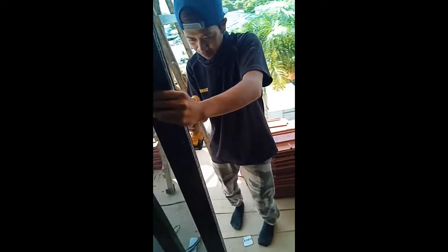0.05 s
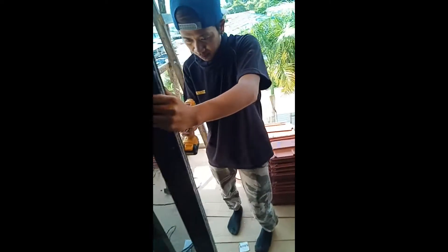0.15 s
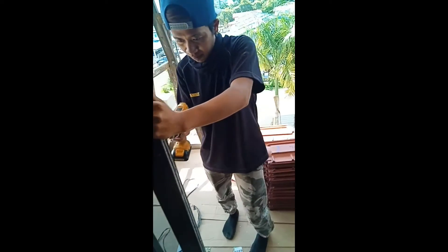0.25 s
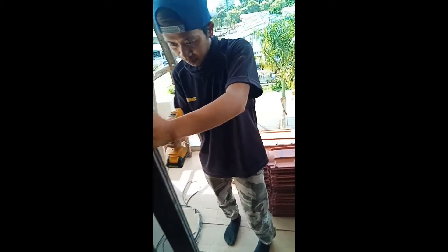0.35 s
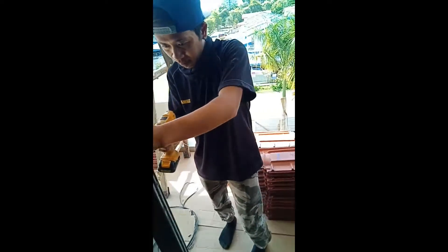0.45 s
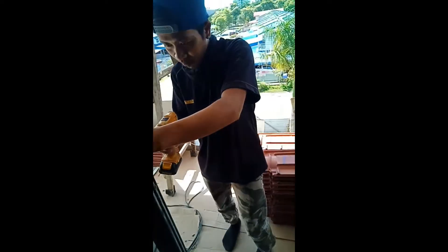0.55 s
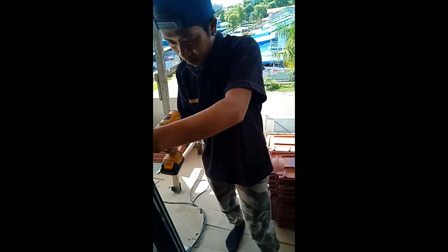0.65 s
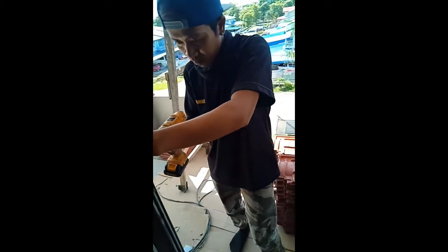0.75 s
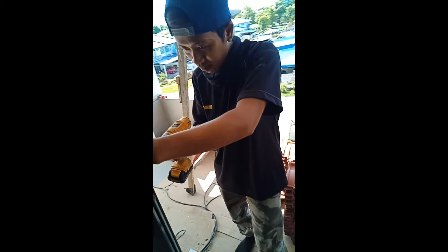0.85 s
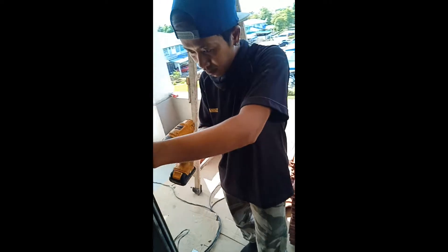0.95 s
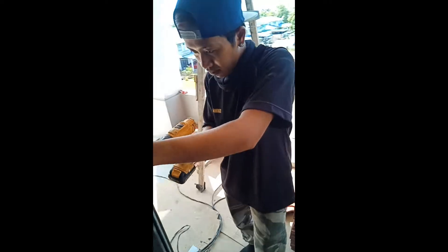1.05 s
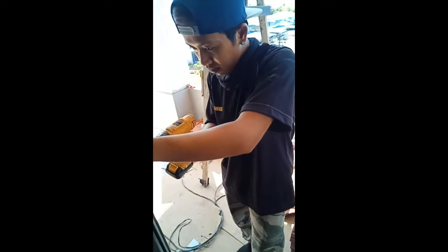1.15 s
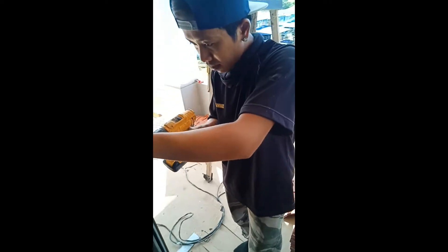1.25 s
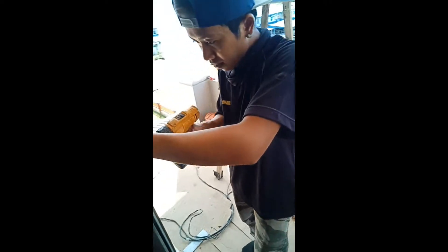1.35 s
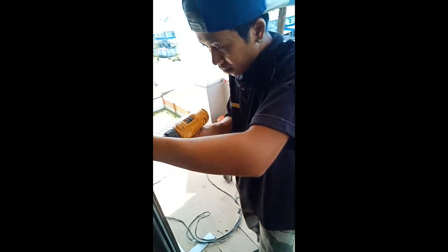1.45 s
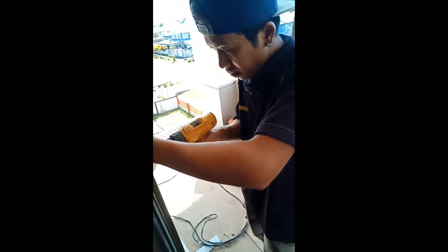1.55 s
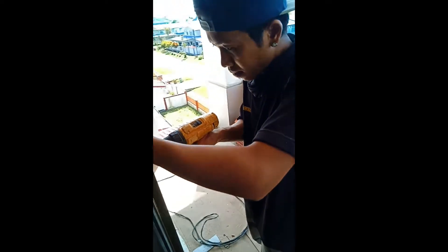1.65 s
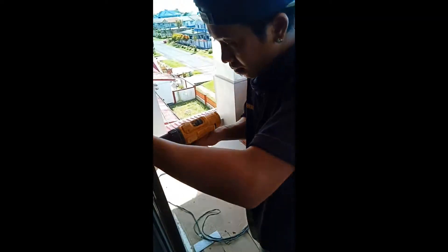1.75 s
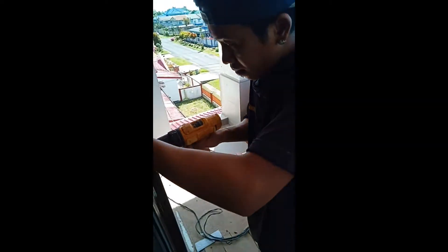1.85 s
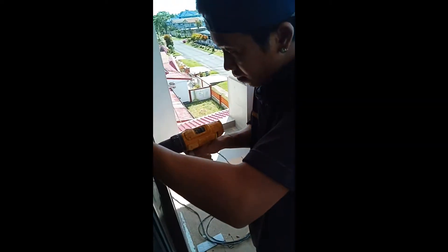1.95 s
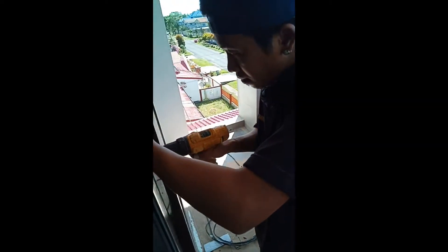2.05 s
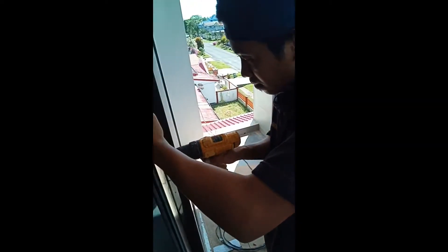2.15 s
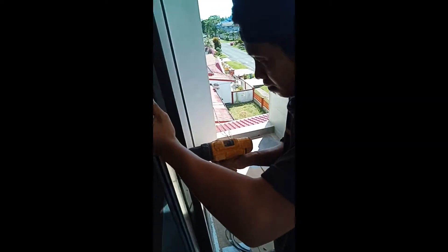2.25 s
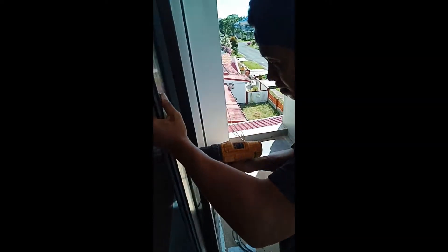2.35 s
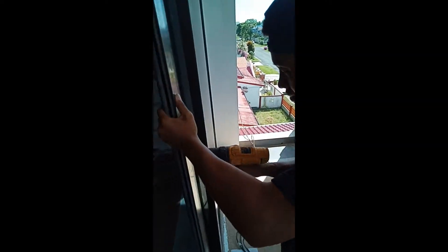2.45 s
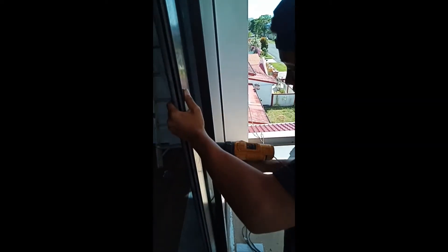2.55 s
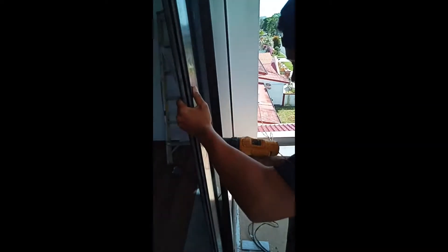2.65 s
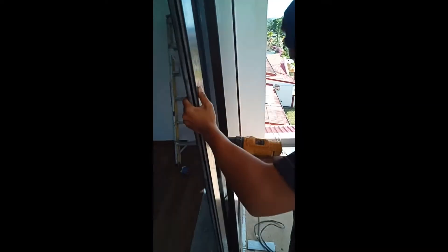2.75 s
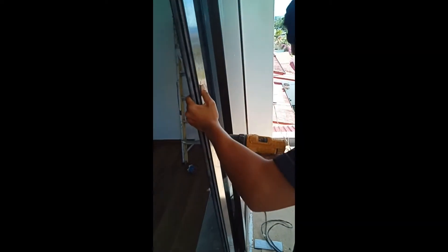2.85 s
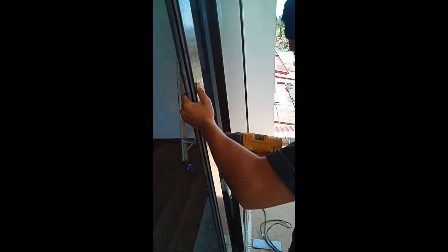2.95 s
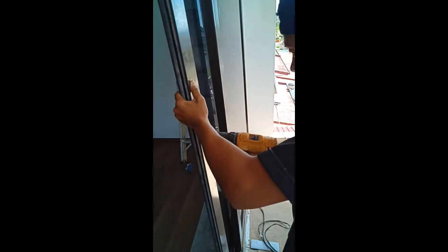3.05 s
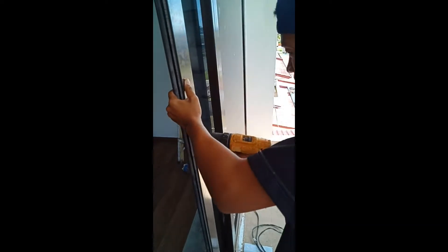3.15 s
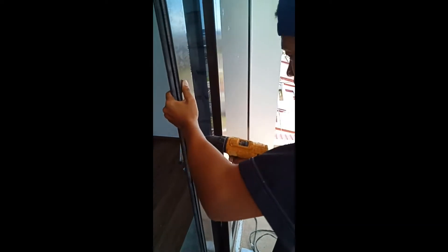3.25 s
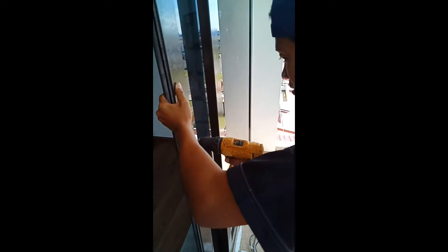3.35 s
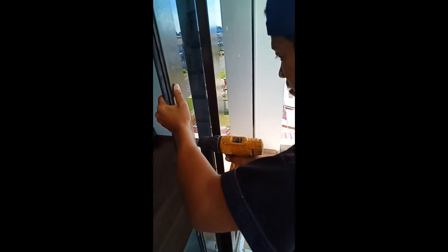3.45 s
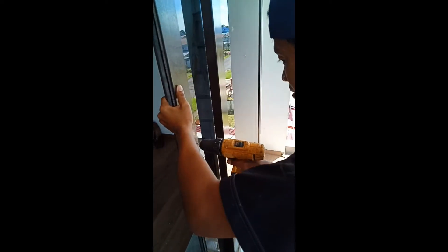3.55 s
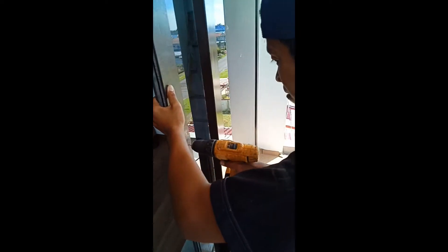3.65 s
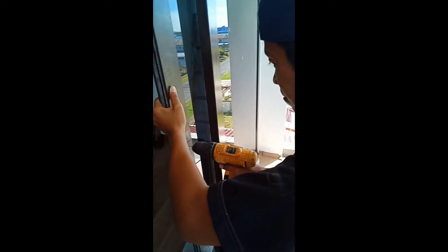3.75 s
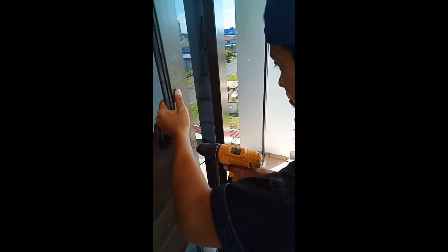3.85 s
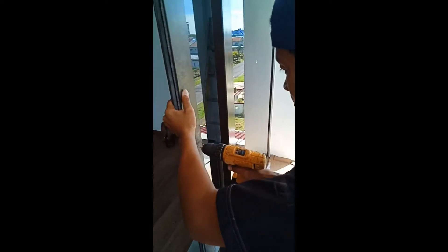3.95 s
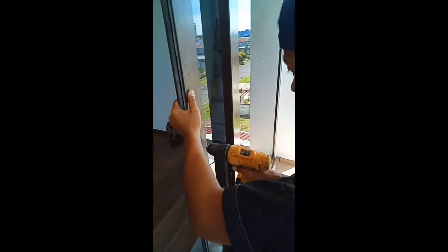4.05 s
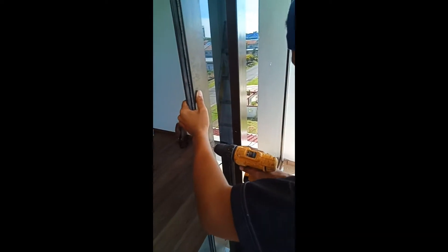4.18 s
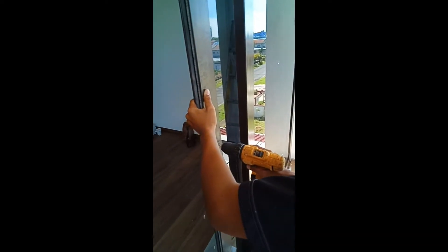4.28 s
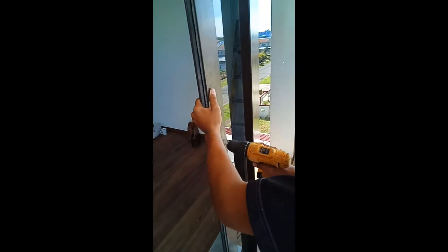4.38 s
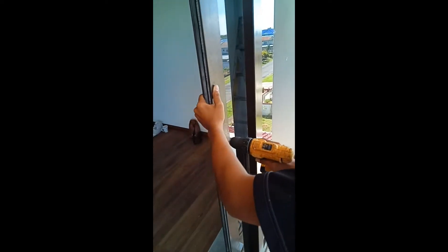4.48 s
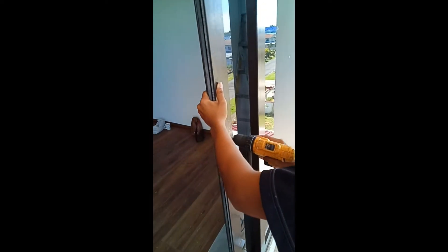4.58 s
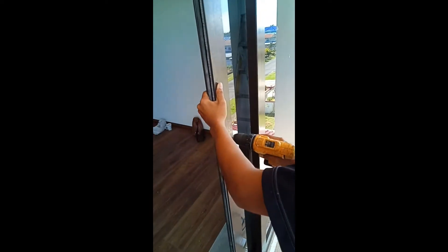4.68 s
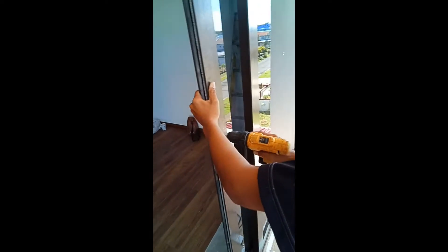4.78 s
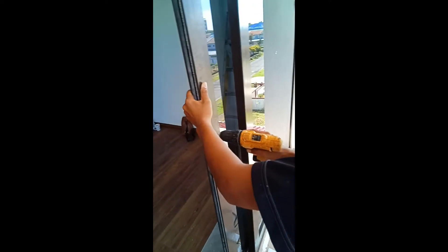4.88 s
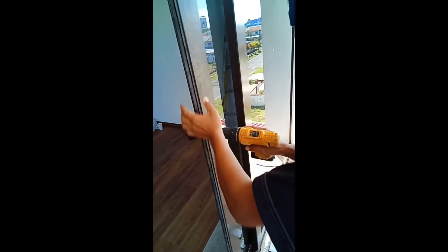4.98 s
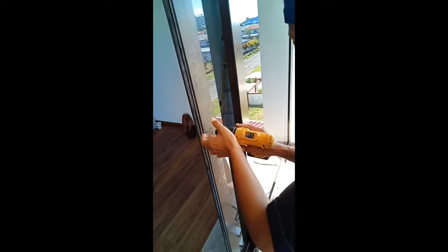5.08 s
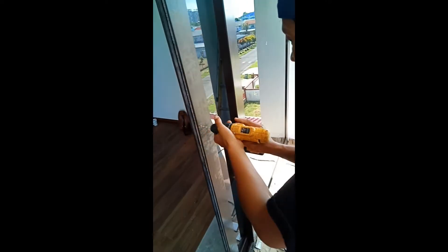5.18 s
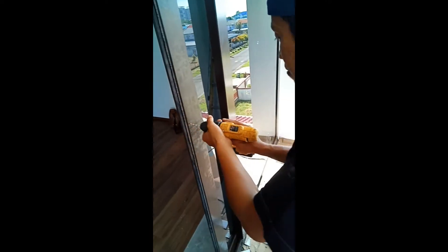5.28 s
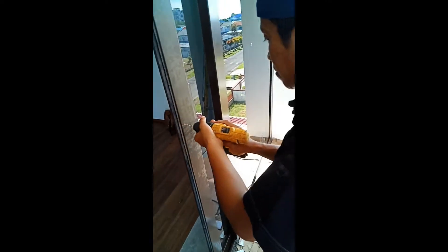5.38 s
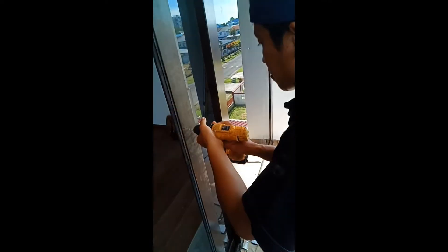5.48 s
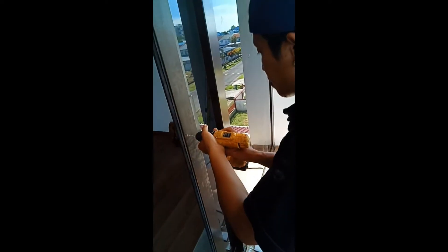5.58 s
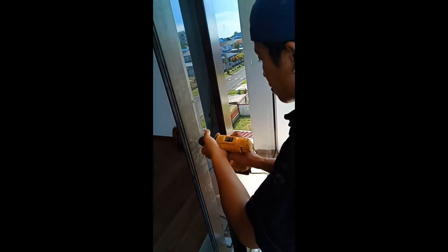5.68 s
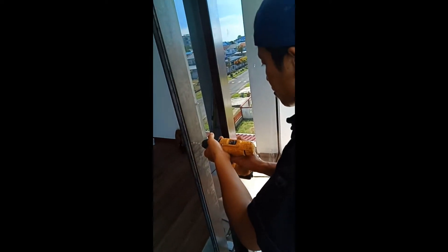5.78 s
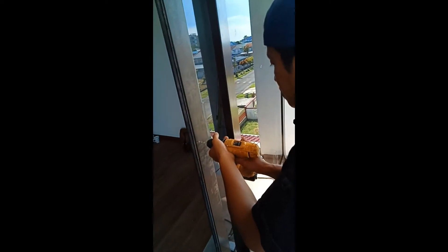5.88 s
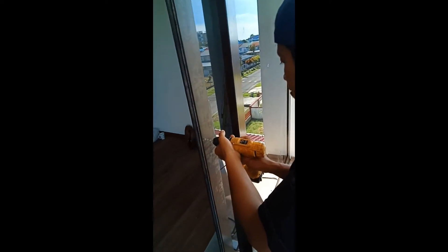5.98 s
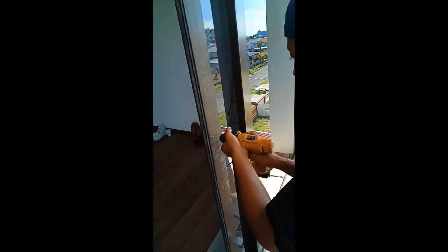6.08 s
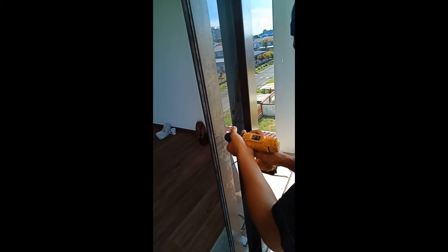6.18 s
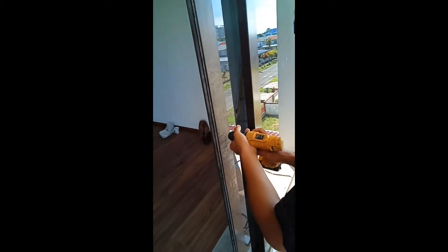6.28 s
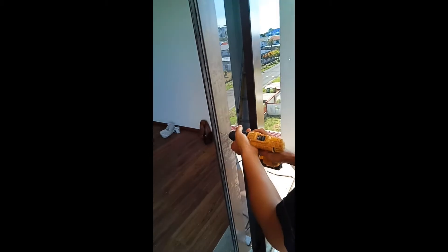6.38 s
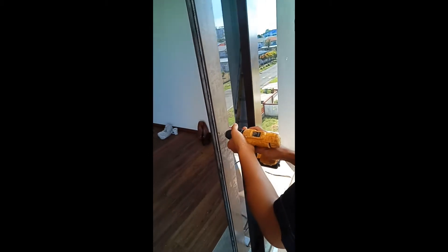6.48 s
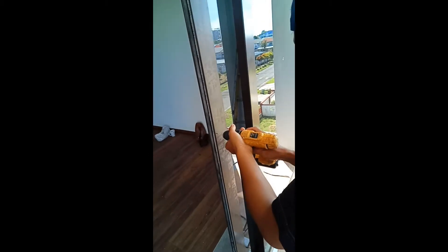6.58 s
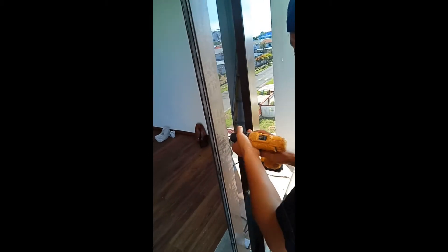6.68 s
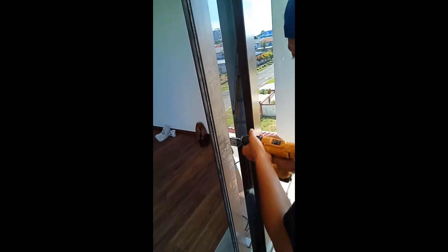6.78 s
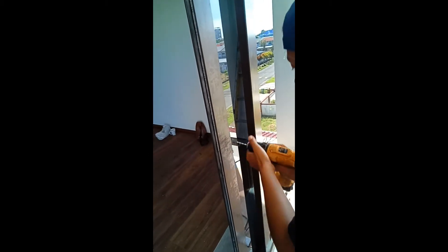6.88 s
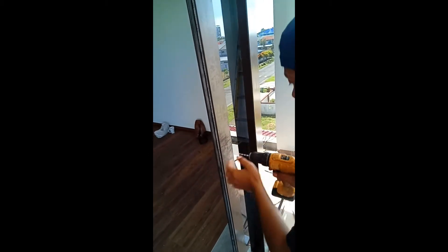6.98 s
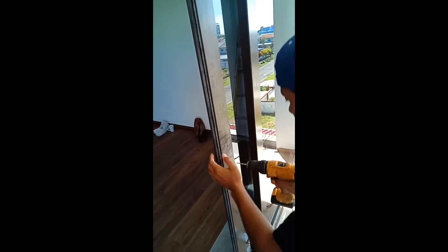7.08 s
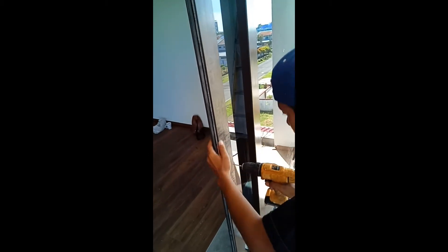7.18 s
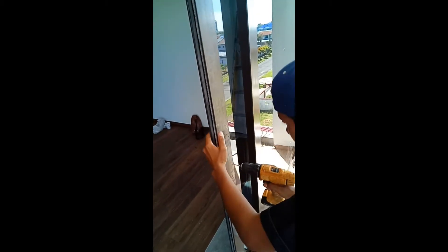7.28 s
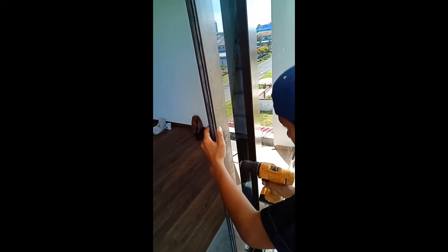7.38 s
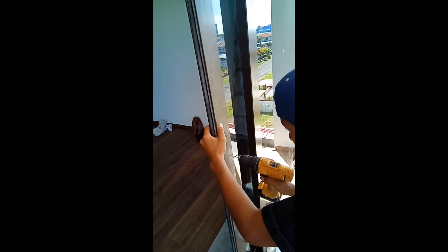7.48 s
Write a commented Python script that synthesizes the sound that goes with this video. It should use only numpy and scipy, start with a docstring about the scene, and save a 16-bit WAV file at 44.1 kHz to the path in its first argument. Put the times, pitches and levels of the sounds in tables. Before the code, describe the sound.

Close power drill: thin electronic whistle, high gear whine scraping metal, snapping chips and slowing, then sharp clacks and two short trigger bursts with roomy echo.

```python
"""Drilling a metal door frame

At the door between a bare room and a balcony, a phone microphone an arm's length from a cordless drill.
Whistling current starts it slowly; a gear-tooth sine whines up through a long bore, then two short bursts follow.
Uneven impacts through filters make the gear rattle, scraping bit and hollow frame; noise bursts make the clacks.
A decaying noise tail is the bare room; filtered noise is the distant traffic and town air."""
import sys
import numpy as np
from scipy import signal
from scipy.fft import rfft, irfft
from scipy.io import wavfile
from scipy.ndimage import uniform_filter1d, minimum_filter1d

SR = 44100
rng = np.random.default_rng(int(sys.argv[2]) if len(sys.argv) > 2 else 0)


def log_audio(samples):
    """Write samples as a 16-bit WAV file to the path given in sys.argv[1]."""
    # one column per channel
    frames = np.atleast_2d(samples).T
    # limit to full scale, then quantise
    limited = np.clip(frames, -1, 1)
    pcm = np.round(limited * 32767).astype(np.int16)
    wavfile.write(sys.argv[1], SR, pcm)


N = 331808
TIME = np.arange(N) / SR
DECAY_60_DB = np.log(1000)

# All levels in the tables are relative: most sources set a further gain on top.
# distant engine drone, resonances: (frequency [Hz], width of one filter pass [Hz], level [dB])
DRONE_MODES = [(125, 9.4, -3), (169.4, 7, -5.5)]
# distant engine drone: (time [s], level [dB])
DRONE_LEVEL = [(.25, -65), (.55, -49), (1.5, -56), (7.2, -51), (7.34, -41), (7.44, -56)]
# spectrum of the town air: (frequency [Hz], level [dB])
AIR_COLOUR = [(18, -41), (30, -13.5), (43, -10.5), (69, -15), (129, -1.5), (355, -0.5), (497, -9),
              (629, -10.5), (1000, -10), (1480, -10.5), (1780, -10.5), (2310, -15), (3500, -17.5),
              (5440, -42.5), (15000, -47)]
# spectrum of the room's answer: (frequency [Hz], level [dB])
ROOM_COLOUR = [(100, 6), (500, -0.5), (1500, 4.5), (2700, 4.5), (3600, -6), (5000, 2), (7000, -1),
               (14000, 8)]
# the door leaf booms when the drill leans on it: (time [s], length [s], level [dB])
BOOMS = [(2.98, .1, -51.5), (4.25, .2, -50.5), (5.68, .05, -52), (6.07, .06, -40), (6.22, .22, -51),
         (6.68, .13, -41)]
# the frame rumbles as it is gripped, shifted or jolted: (time [s], length [s], level [dB])
SHOVES = [(1.0, 0.15, -42.5), (1.13, 0.17, -48), (2.24, 0.086, -43), (4.26, 0.11, -44.5),
          (5.426, 0.025, -37.5), (5.53, 0.056, -40), (5.7, 0.15, -42), (5.84, 0.025, -40),
          (6.635, 0.065, -26.5), (6.76, 0.056, -32), (6.88, 0.093, -40)]
# low shudder of the frame: (frequency [Hz], level [dB])
FRAME_LOW_COLOUR = [(30, -59), (60, -16), (110, 1.5), (170, 7), (240, 6.5), (340, 5), (480, 3.5),
                    (650, -6.5), (1000, -56), (4000, -81)]
# ring of the hollow frame under the bit: (frequency [Hz], width of one filter pass [Hz], level [dB])
FRAME_MODES = [(1214, 240, 1.5), (1318, 163, 0.5), (1435, 92, -2)]
# the bit snags on the rim of the hole and chips snap off: (time [s], level [dB])
SNAPS = [(4.324, -35), (4.333, -32), (4.411, -39), (4.42, -33), (4.947, -56), (5.826, -53), (6.187, -39),
         (6.33, -35)]
# spectrum of snapping chips and of the bright rasp: (frequency [Hz], level [dB])
SNAP_COLOUR = [(3000, -29.5), (4600, 7), (6300, 9), (8500, -11), (12000, -18), (15000, -14.5)]
# short swells of mid-band scraping and bright rasp, one as the motor spins up:
# (middle time [s], length [s], level [dB])
SCRAPE_SWELLS = [(3.336, 0.2, -42), (4.533, 0.1, -34), (4.685, 0.15, -31), (6.086, 0.05, -29.5),
                 (6.197, 0.068, -35), (6.34, 0.041, -36.5), (6.447, 0.061, -33), (6.624, 0.043, -37),
                 (6.73, 0.018, -30.5)]
# clacks of chuck, clutch and bit: (time [s], level [dB], level of the rattle against the clack [dB])
CLACKS = [(1.519, -20, -12.5), (4.3236, -7.5, -9.5), (4.333, -7.5, -12), (4.411, -9.5, -7),
          (5.139, -30, -6.5), (5.1797, -23.5, -4.5), (5.209, -32.5, -11), (5.382, -15, -5),
          (5.401, -13, -12), (5.4086, -2.5, -5), (5.419, -8.5, -10.5), (5.554, -9, -12), (5.65, -16, -25),
          (5.825, -16, -6.5), (6.0504, -4, -14.5), (6.069, -11.5, -5), (6.078, -1.5, -15.5),
          (6.189, -7.5, -25), (6.691, 1, -17), (6.7182, -6.5, 2)]
# spectrum of clacks and loose chips: (frequency [Hz], level [dB])
CLACK_COLOUR = [(100, -41.5), (400, -16), (900, -11.5), (1500, -6.5), (2200, -6), (2900, 0.5), (3800, 6),
                (4400, -3.5), (5200, -21), (7000, -31), (9500, -49), (15000, -50)]
# the motor kicks at sudden starts and shakes the tool: (time [s], level [dB])
KICKS = [(5.411, -23), (6.08, -24)]
# spectrum of the kicks: (frequency [Hz], level [dB])
KICK_COLOUR = [(250, -9), (800, -14.5), (1400, -2.5), (2300, 7), (3200, -5), (5000, -28), (9000, -60.5)]
# whistle of the speed controller at part trigger: (time [s], level [dB])
WHISTLE_LEVEL = [(1.452, -43), (1.6, -43), (1.7, -55.5), (2.04, -39.5), (2.24, -37.5)]
# motor effort, one curve per pull of the trigger: (time [s], level [dB])
EFFORT_PULLS = [
    [(1.15, -58), (1.48, -53.5), (1.64, -42), (2.02, -40), (2.52, -24.5), (3.4, -25.5), (4.15, -26),
     (4.42, -25), (4.72, -29.5), (4.84, -40.5), (5.0, -50.5), (5.33, -57)],
    [(5.42, -24.5), (5.6, -23), (5.66, -40)],
    [(6.085, -21.5), (6.14, -22), (6.55, -22), (6.73, -22.5)],
]
# tooth-mesh rate in the long bore, before waver: (time [s], rate [Hz])
BORE_SPEED = [(2.1, 1185), (2.26, 1790), (2.32, 2300), (2.41, 2669), (2.47, 3352), (2.53, 3750),
              (2.7, 3985), (3.2, 4018), (3.6, 3992), (3.88, 3935), (4.13, 3955), (4.27, 3470), (4.38, 2924),
              (4.49, 2590), (4.54, 1920)]
# tooth-mesh rate in the first burst, before waver: (time [s], rate [Hz])
JOG_SPEED = [(5.42, 2283), (5.46, 2663), (5.52, 2841), (5.65, 2702)]
# tooth-mesh rate in the last burst, before wobble and waver: (time [s], rate [Hz])
BURST_SPEED = [(6.09, 2293), (6.165, 3320), (6.235, 3540), (6.3, 3400), (6.33, 3190), (6.38, 3400),
               (6.5, 3420), (6.56, 3700), (6.62, 3850), (6.69, 3480)]
# spectrum of the gearbox housing: (frequency [Hz], level [dB])
HOUSING_COLOUR = [(250, -30.5), (550, -13.5), (1700, -12.5), (2200, -7.5), (2800, -2), (3550, 2.5),
                  (4050, -5), (4450, -11.5), (5000, -22.5), (6300, -31), (7300, -38), (9500, -63),
                  (15300, -59)]
# gear whine against the effort: (time [s], level [dB])
WHINE_LEVEL = [(2.12, -9), (2.29, -13), (2.38, -2), (2.54, -1), (2.66, -10), (2.95, -7.5), (3.28, -5),
               (3.36, -17), (3.8, -2.5), (4.05, -8), (4.24, -1), (4.33, -12), (4.46, 0), (4.55, -14.5),
               (5.6, -10.5), (6.1, -10), (6.2, 2), (6.69, 2)]
# lines of motor and gearbox: (multiple of the motor shaft rate)
SHAFT_MULTIPLES = [.5, .95, 1, 1.3, 2, 2.48, 3, 4, 4.97, 6, 13, 24, 28, 34, 35, 36]
# the same lines in the same order: (level [dB])
SHAFT_DB = [-24, -29, -23.5, -24.5, -30, -21, -13.5, -25.5, -32, -23.5, -39, -46, -51.5, -55, -60.5, -60]
# air hiss of the motor fan and brushes: (frequency [Hz], level [dB])
FAN_COLOUR = [(3000, -11.5), (4400, 4), (5400, -9.5), (6100, 12), (7100, 7), (7600, -1.5), (8200, -2),
              (8700, -8.5), (10000, -17), (11500, -4.5), (12600, -15), (14300, -1.5), (15100, -2)]


def undb(db):
    """Decibels to gain."""
    return 10 ** (np.asarray(db) / 20)


def unit(x):
    """Scale to rms 1."""
    return x / np.sqrt(np.mean(x ** 2))


def noise():
    """White noise over the whole scene."""
    return rng.standard_normal(N)


def curve(rows, axis):
    """One column of a table, joined by straight lines in time."""
    rows = np.array(rows)
    return np.interp(TIME, rows[:, 0], rows[:, axis])


def gain(rows, axis, fade_s=0.024):
    """A dB column as a gain that fades away before and after its table."""
    outside = np.maximum(rows[0][0] - TIME, 0) + np.maximum(TIME - rows[-1][0], 0)
    return undb(curve(rows, axis)) * np.exp(-(outside / fade_s) ** 2)


def walk(rate_hz):
    """Random wander of rms 1: held random values, smoothed over one step."""
    step = max(int(SR / rate_hz), 1)
    held_values = np.repeat(noise()[:N // step + 1], step)
    return unit(uniform_filter1d(held_values, step)[:N])


def held(start_s, end_s, attack_s, release_s):
    """An envelope that swells up to its start, holds to its end and dies away."""
    before = np.maximum(start_s - TIME, 0) / attack_s
    after = np.maximum(TIME - end_s, 0) / release_s
    return np.exp(-before ** 2 - after ** 2)


def pushes(events, attack_s=0.021, release_s=0.033):
    """An envelope that swells, holds and lets go for each (time, length, level)."""
    return sum(undb(db) * held(s, s + length, attack_s, release_s) for s, length, db in events)


def fading(events, t60):
    """An envelope that jumps at each (time, level) and falls 60 dB in t60 seconds."""
    return sum(undb(db) * (TIME >= s) * np.exp(-DECAY_60_DB * np.abs(TIME - s) / t60)
               for s, db in events)


def colour(x, points):
    """Causal minimum-phase filter through (Hz, dB) points, from the cepstrum of the log gain."""
    hz, db = np.transpose(points)
    grid = np.fft.rfftfreq(4096, 1 / SR)
    log_gain = np.log(undb(np.interp(np.log(grid + 1), np.log(hz), db)))
    cepstrum = irfft(log_gain)
    # fold the second half onto the first: all energy then comes as early as it can
    cepstrum[1:len(grid) - 1] *= 2
    cepstrum[len(grid):] = 0
    response = irfft(np.exp(rfft(cepstrum)))
    return signal.fftconvolve(x, response)[:len(x)]


def resonate(x, modes):
    """Parallel resonances (Hz, width, dB), each peak filter passed twice for steep sides."""
    out = 0
    for hz, width, db in modes:
        b, a = signal.iirpeak(hz, hz / width, fs=SR)
        once = signal.lfilter(b, a, x)
        out = out + undb(db) * signal.lfilter(b, a, once)
    return unit(out)


def impacts(rate_hz, scatter_db):
    """About one small blow per cycle, of random size and up to half a cycle early."""
    cycle = np.floor(np.cumsum(rate_hz * np.ones(N)) / SR + rng.uniform(0, 1, N) / 2)
    fresh = np.diff(np.maximum.accumulate(cycle), prepend=0) > 0
    return fresh * noise() * undb(scatter_db * np.clip(noise(), -2, 2))


def outdoors(drone_db=-2, drone_swell_db=-2.5, tyres_db=-54.0, tyres_half_width_hz=130, air_db=-50.5):
    """Engines drone, a passing car's tyre hiss rises in pitch until it is gone, town air swells softly."""
    drone_level = drone_db + curve(DRONE_LEVEL, 1) + drone_swell_db * walk(9.8)
    drone = resonate(noise(), DRONE_MODES) * undb(drone_level)
    # low-passed complex noise, shifted up to a sliding centre frequency
    lowpass = signal.butter(2, tyres_half_width_hz, fs=SR, output="sos")
    hiss = signal.sosfilt(lowpass, noise() + 1j * noise())
    centre_hz = 947 + 205 * TIME
    tyres = unit(np.real(hiss * np.exp(2j * np.pi * np.cumsum(centre_hz) / SR)))
    tyres = tyres * undb(tyres_db) * held(0, 2.5, .3, .3)
    air = unit(colour(noise(), AIR_COLOUR)) * undb(air_db + 0.47 * walk(1.7))
    return drone + tyres + air


def room(x, wet_db=-9, low_t60=1.14, mid_t60=0.94, high_t60=0.85, delay_s=0.0068):
    """The bare room behind the door answers with a dense noise tail, shortest in the treble."""
    t = TIME[:int(1.5 * SR)]
    hiss = rfft(rng.standard_normal(len(t)))
    hz = np.fft.rfftfreq(len(t), 1 / SR)
    band = np.digitize(hz, [1000, 4500])
    tail = 0
    for k, t60 in enumerate([low_t60, mid_t60, high_t60]):
        tail = tail + irfft(hiss * (band == k), len(t)) * np.exp(-DECAY_60_DB * t / t60)
    # scale by the middle band's decay so its length hardly changes its energy
    tail *= (t > delay_s) * np.sqrt(2 * DECAY_60_DB / (mid_t60 * SR))
    return x + undb(wet_db) * signal.fftconvolve(x, colour(tail, ROOM_COLOUR))[:N]


def sway(sway_db=-2, centre_hz=88, width_hz=55):
    """The door leaf booms softly under the push: noise through one low resonance."""
    return resonate(noise(), [(centre_hz, width_hz, 0)]) * undb(sway_db) * pushes(BOOMS)


def frame(effort, speed, shudder_db=-19, labour_db=11, uneven_db=0.65, shove_db=-2):
    """The frame shudders under the bit, more as the motor labours, and rumbles at each shove."""
    shudder = effort * undb(shudder_db + labour_db * (1 - speed) + uneven_db * walk(9))
    judder = impacts(900, 1.5)
    return (shudder + undb(shove_db) * pushes(SHOVES)) * unit(colour(judder, FRAME_LOW_COLOUR))


def snaps(crackle_db=2):
    """Chips break off in short, bright crackles of dense impacts."""
    return fading(SNAPS, t60=0.062) * unit(colour(impacts(3500, crackle_db), SNAP_COLOUR))


def bit(effort, speed, scrape_db=-14.0, scrape_power=.75, swell_db=-1.5, uneven_db=1.6, rasp_db=-23):
    """Chips tear from the metal and ring the frame with effort and speed; short swells add bright rasp."""
    swells = sum(undb(db) * np.exp(-(2 * (TIME - s) / length) ** 2) for s, length, db in SCRAPE_SWELLS)
    scrape = effort * speed ** scrape_power * undb(scrape_db + uneven_db * walk(12))
    scraping = scrape + undb(swell_db) * swells
    chips = impacts(900, 3.9)
    rasp = undb(rasp_db) * swells * unit(colour(chips, SNAP_COLOUR))
    return scraping * resonate(chips, FRAME_MODES) + rasp


def grit(grit_db=-9, ticks_per_s=250):
    """Loose chips caught in the flutes tick at random against bit and chuck."""
    ticks = (rng.uniform(0, 1, N) < ticks_per_s / SR) * rng.uniform(-0.78, 1, N)
    return undb(grit_db) * unit(colour(ticks, CLACK_COLOUR))


def clacks(click_db=-1.5, rattle_db=-4, click_t60=0.011, rattle_t60=0.077):
    """Hard knocks in the drive: a sharp crack, with loose parts buzzing to rest."""
    out, count = np.zeros(N), 8192
    t = TIME[:count]
    for s, db, buzz_db in CLACKS:
        crack = rng.standard_normal(count) * np.exp(-DECAY_60_DB * t / click_t60)
        click = colour(crack, CLACK_COLOUR)
        click /= np.abs(click).max()
        buzz = unit(colour(rng.standard_normal(count), CLACK_COLOUR))
        buzz = buzz * np.exp(-DECAY_60_DB * t / rattle_t60)
        start = int(s * SR)
        knock = undb(click_db) * click + undb(rattle_db + buzz_db) * buzz
        out[start:start + count] += undb(db) * knock
    return out


def kicks():
    """Starting torque throws the gear train against its slack in a dull clatter."""
    return fading(KICKS, t60=0.38) * unit(colour(impacts(1500, 1.5), KICK_COLOUR))


def controller(switching_hz=3940, flicker_db=1.0):
    """At part trigger the controller chops the current and the windings whistle on one pitch."""
    whistle = unit(np.sin(2 * np.pi * switching_hz * TIME))
    return whistle * gain(WHISTLE_LEVEL, 1, 0.0067) * undb(flicker_db * walk(27))


def motor_speed(waver=.0007, load_waver=.09, chuck_hz=20, wobble_share=.022):
    """Tooth-mesh rate [Hz] and share of top speed; the slower it runs, the less steady it is."""
    # in the last burst the bit catches once per turn of the chuck and the speed wobbles
    from_s, to_s = 6.177, 6.5
    wobble = wobble_share * np.cos(2 * np.pi * chuck_hz * (TIME - from_s)) * held(from_s, to_s, .02, .02)
    mesh_hz = curve(BORE_SPEED + JOG_SPEED + BURST_SPEED, 1) * (1 + wobble)
    speed = mesh_hz / mesh_hz.max()
    unsteadiness = waver + load_waver * (1 - speed) ** 1.6
    return mesh_hz * (1 + unsteadiness * walk(160)), speed


def gears(mesh_hz, scatter_db=-2.0, throb_db=0.7, rattle_db=-2.5):
    """Teeth knock through their backlash and ring the housing, with a randomly uneven level."""
    # the root keeps the power even as the knocks come faster
    teeth = impacts(mesh_hz, scatter_db) / np.sqrt(mesh_hz)
    return undb(rattle_db) * unit(colour(teeth * undb(throb_db * walk(60)), HOUSING_COLOUR))


def motor(mesh_hz, speed, flutter_db=2.0, lines_db=-2, lines_power=4.8, fan_db=-28, fan_power=1.2):
    """The meshing teeth whine, shaft unbalance adds lines at multiples of its rate, and the fan hisses."""
    pinion_teeth = 12
    shaft = 2 * np.pi * np.cumsum(mesh_hz / pinion_teeth) / SR
    whine = unit(np.sin(pinion_teeth * shaft) * undb(flutter_db * walk(110))) * gain(WHINE_LEVEL, 1)
    lines = 0
    for multiple, db in zip(SHAFT_MULTIPLES, SHAFT_DB):
        line = np.sin(multiple * shaft) * undb(2.5 * walk(40))
        lines = lines + undb(db) * unit(line)
    fan = unit(colour(noise(), FAN_COLOUR))
    # fan air grows with speed, the unbalance of the shafts more steeply still
    return whine + undb(lines_db) * lines * speed ** lines_power + undb(fan_db) * fan * speed ** fan_power


def scene():
    """Effort and speed drive drill, bit and frame, which sound into the room; traffic comes from outside."""
    effort = sum(gain(pull, 1) for pull in EFFORT_PULLS)
    mesh_hz, speed = motor_speed()
    door = sway() + frame(effort, speed) + snaps() + bit(effort, speed)
    running = effort * (grit() + gears(mesh_hz) + motor(mesh_hz, speed))
    drill = clacks() + kicks() + controller() + running
    return (outdoors() + room(door + drill))[None]


def record(dry, low_hz=56, top_hz=15500):
    """The phone thins the deep bass, turns down peaks above full scale and cuts the top."""
    thin = signal.sosfilt(signal.butter(2, low_hz, "high", fs=SR, output="sos"), dry)
    headroom = 1 / np.maximum(np.abs(thin), 1)
    # lowest headroom nearby, smoothed: the gain eases down ahead of each peak
    limited = thin * uniform_filter1d(minimum_filter1d(headroom, size=129), size=129)
    return signal.sosfilt(signal.ellip(10, .2, 70, top_hz, fs=SR, output="sos"), limited)


dry = scene()
out = record(dry)
log_audio(out)
```